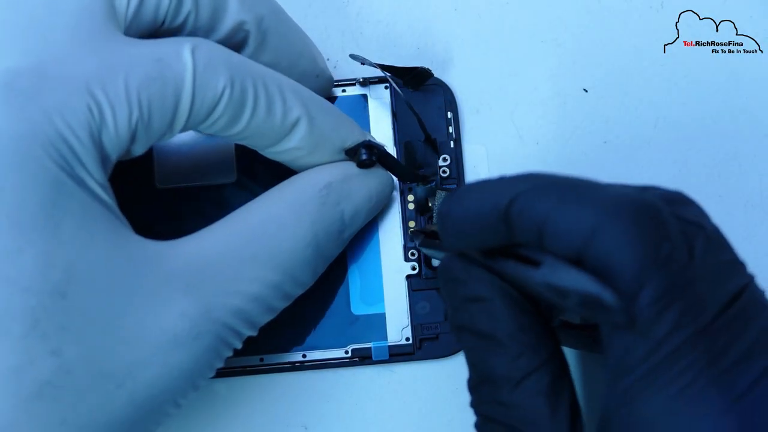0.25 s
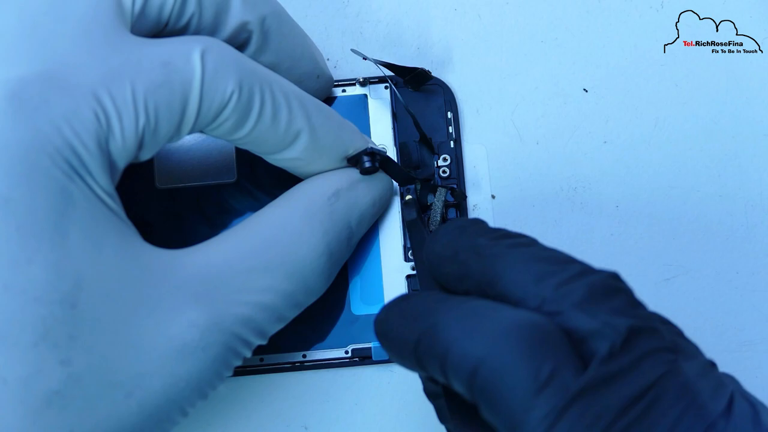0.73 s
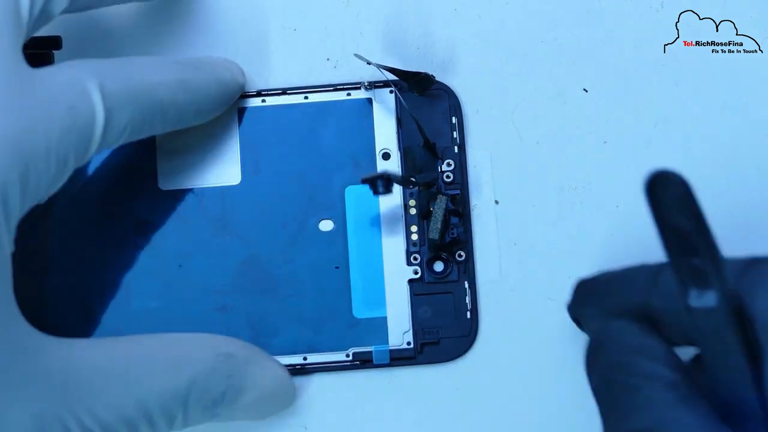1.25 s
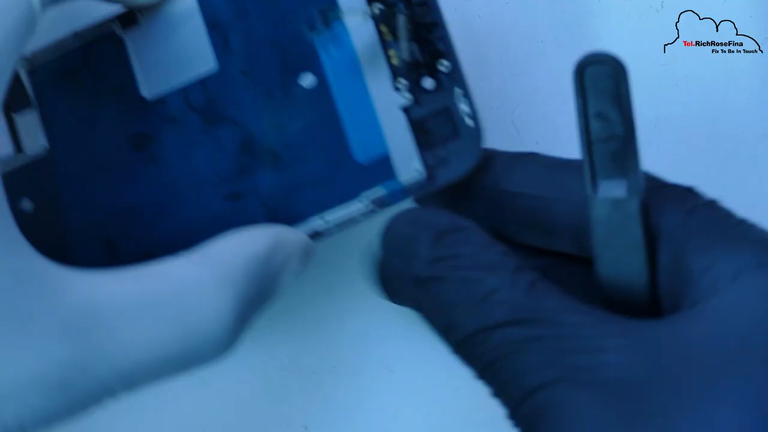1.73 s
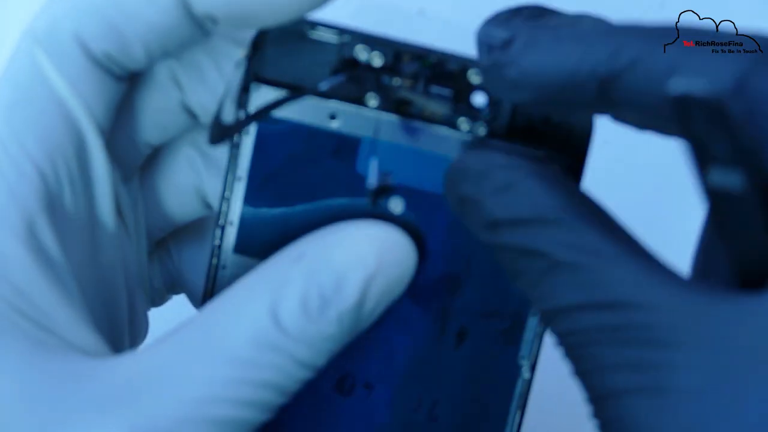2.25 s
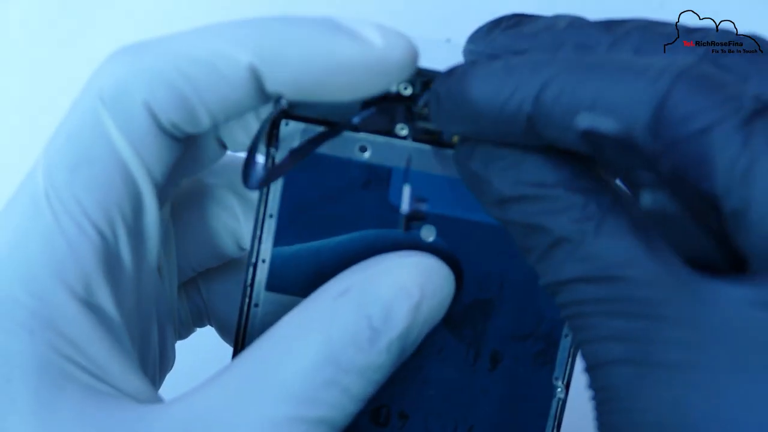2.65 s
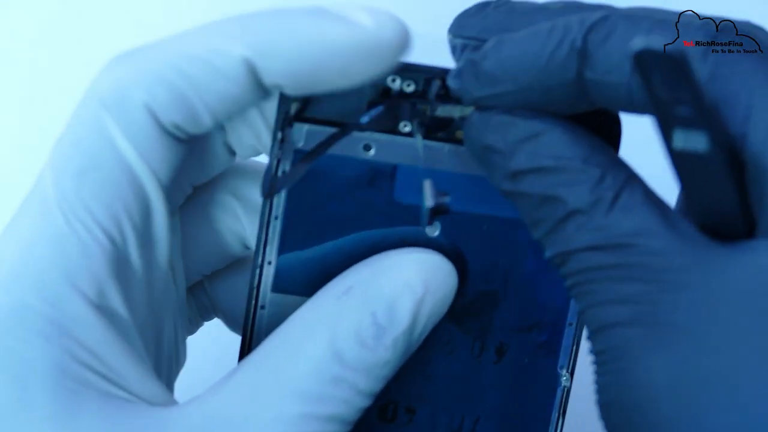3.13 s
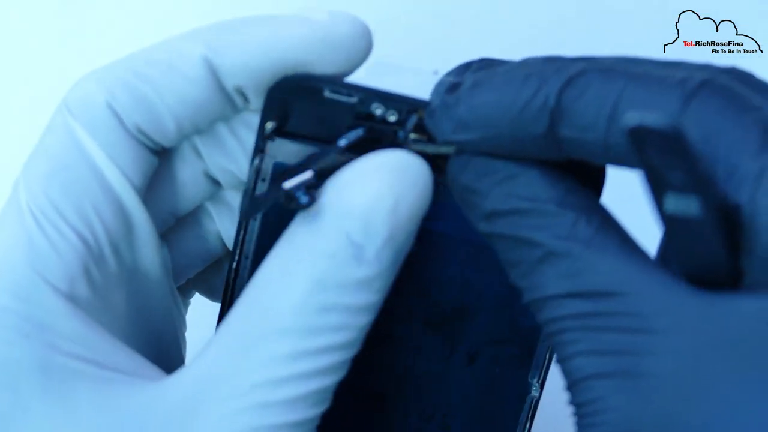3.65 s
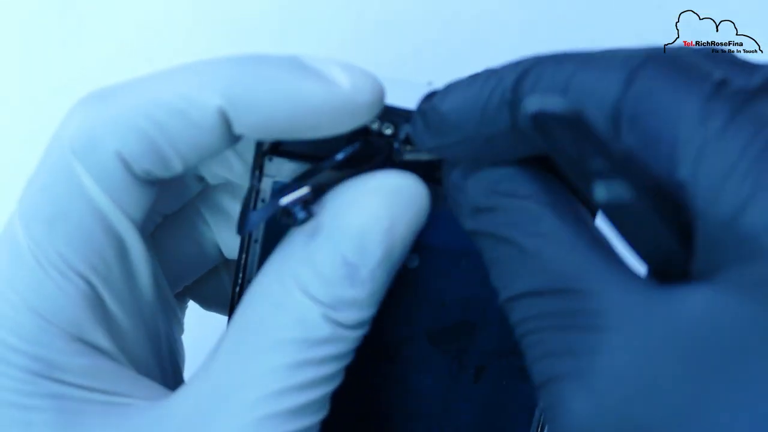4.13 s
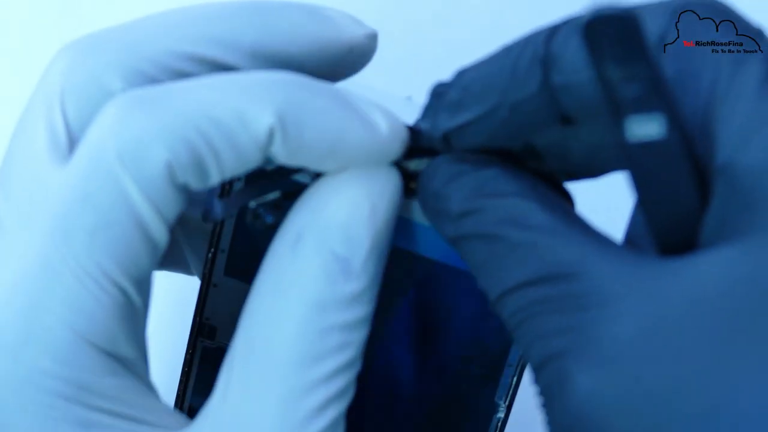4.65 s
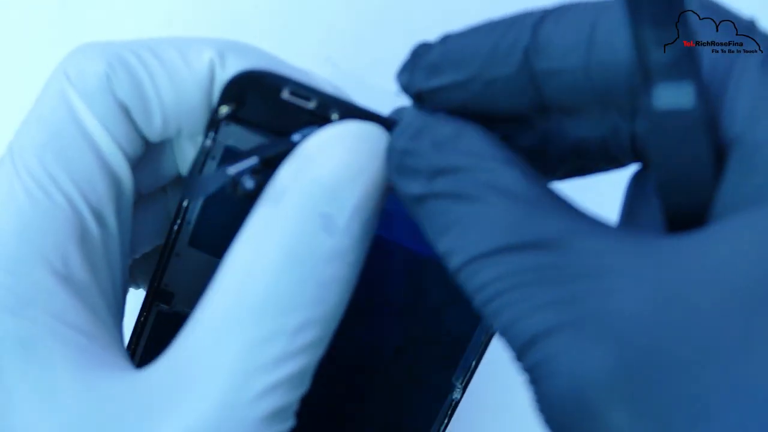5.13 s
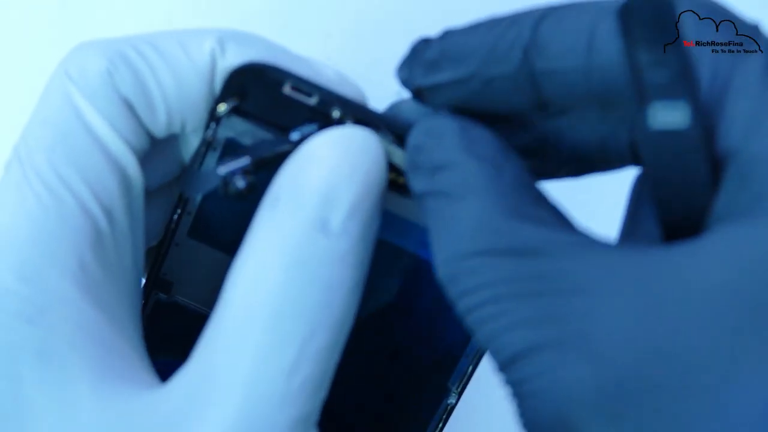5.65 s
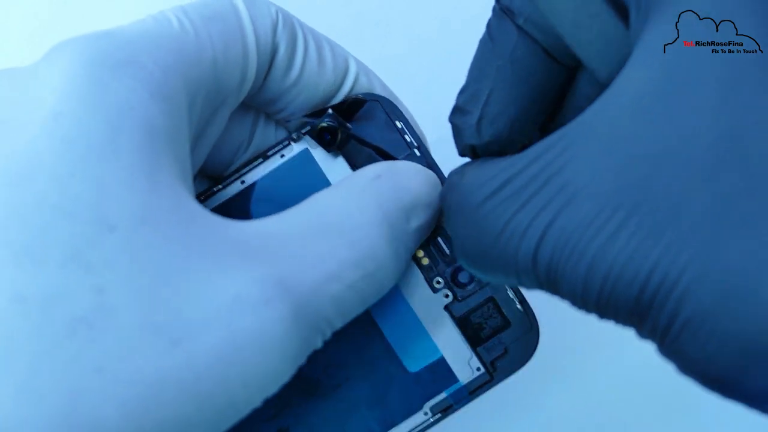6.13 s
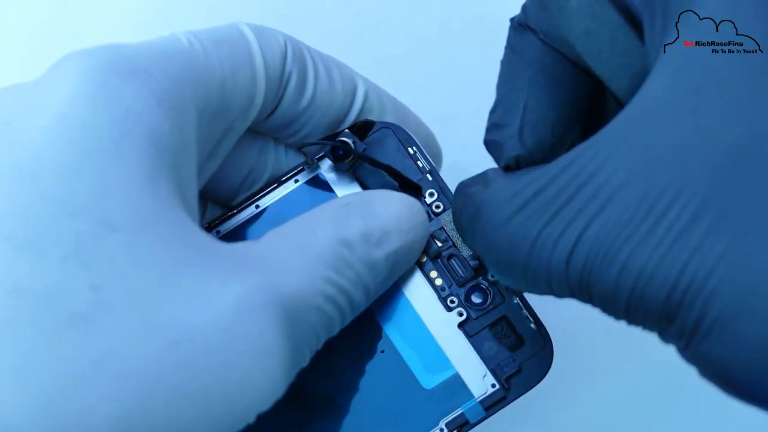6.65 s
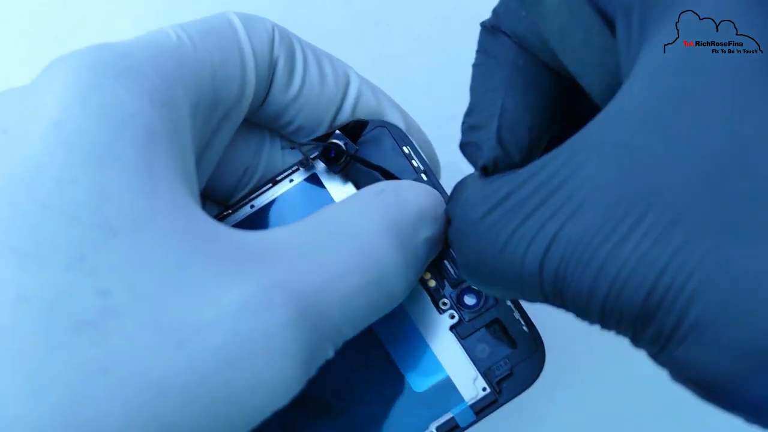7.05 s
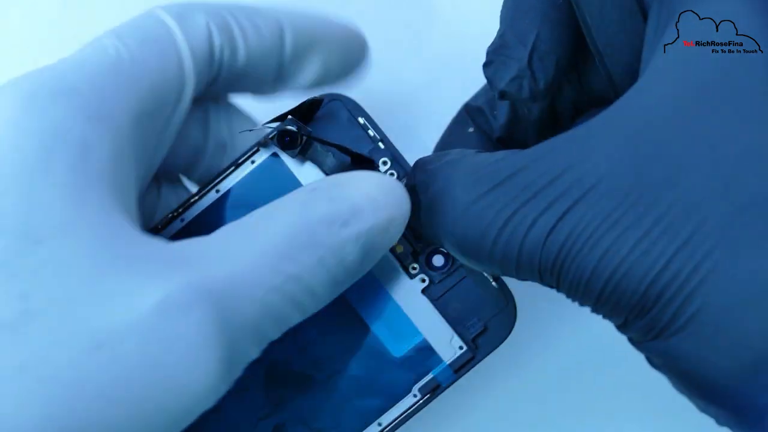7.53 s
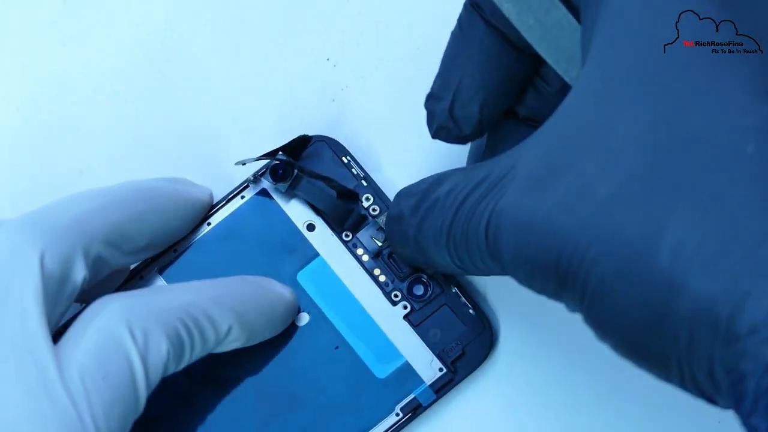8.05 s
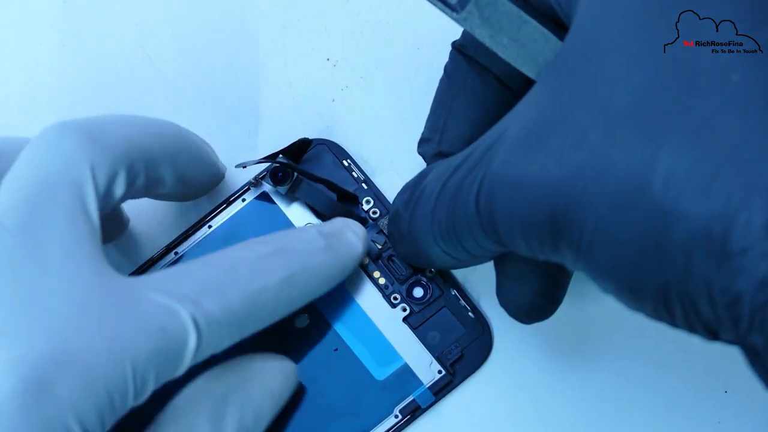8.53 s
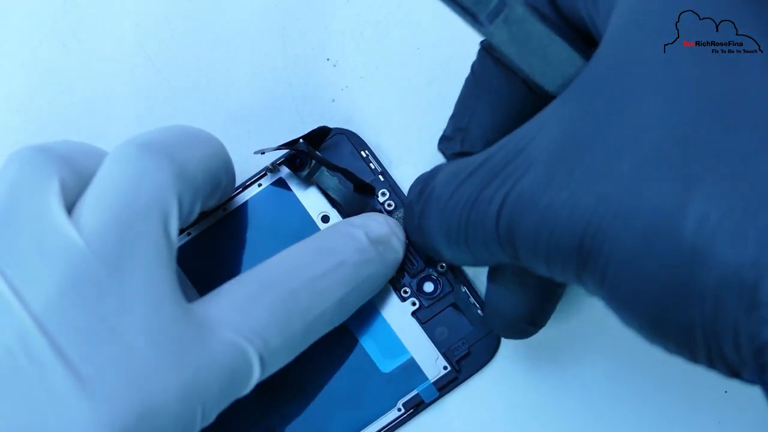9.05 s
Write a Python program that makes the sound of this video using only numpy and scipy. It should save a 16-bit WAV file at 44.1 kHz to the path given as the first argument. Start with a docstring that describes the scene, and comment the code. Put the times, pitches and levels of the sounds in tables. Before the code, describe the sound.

Metal tweezers tick, scrape and snap small parts on a hand-held phone screen while rubber gloves rub faintly over a low workshop hum.

```python
"""Tweezers on a phone screen assembly

Steel tweezers tick (impact), scrape (stick-slip) and snap small parts home on a hand-held screen; each blow
excites damped resonances. Rubber gloves rub and crinkle as filtered noise and grains, with short raspy squeaks.
The bench hums as resonant noise and booms twice; after the second boom a stand sways. A fan adds harmonics
and shaped air noise. The two channels differ only in a faint hiss, and the level dips briefly twice."""
import sys
import numpy as np
from scipy import signal
from scipy.fft import rfft, irfft, next_fast_len
from scipy.io import wavfile
from scipy.ndimage import uniform_filter1d, map_coordinates

SR = 44100
rng = np.random.default_rng(int(sys.argv[2]) if len(sys.argv) > 2 else 0)


def to_wav(s):
    """Save 16-bit WAV."""
    ch = np.atleast_2d(s).T  # columns
    pcm = np.round(np.clip(ch, -1, 1) * 32767)  # PCM
    wavfile.write(sys.argv[1], SR, pcm.astype(np.int16))


N = 410130
T = np.arange(N) / SR  # scene time [s]
AGE = np.arange(SR // 4) / SR  # time since the start of a short sound [s]


def amp(db):
    """Logarithmic level: decibels to amplitude gain."""
    return 10 ** (np.asarray(db) / 20)


def unit(x):
    """Normalization: scale to an rms of 1."""
    return x / np.sqrt(np.mean(x ** 2) + 1e-20)


def sized(x, db, length=1 / 100):
    """Equal energy: give a short sound the energy of db rms held for length seconds."""
    energy = np.sum(x ** 2) + 1e-20
    return x * amp(db) * np.sqrt(length * SR / energy)


def level(rows):
    """Linear interpolation in decibels: gain per sample from rows of (time [s], level [dB])."""
    return amp(np.interp(T, *np.transpose(rows)))


def swells(rows):
    """Power summation of Gaussian swells from rows of (middle [s], length [s], peak level [dB])."""
    power = 0
    for middle, length, db in rows:
        bell = np.exp(-2 * ((T - middle) / length) ** 2)
        power = power + (amp(db) * bell) ** 2
    return np.sqrt(power)


def along(points, hz):
    """Spectral envelope: gain of (frequency [Hz], level [dB]) points joined on a log axis."""
    f, db = np.transpose(points)
    return amp(np.interp(np.log(hz + 1), np.log(f), db))


def wobble(rate):
    """Slow random modulation: a smooth curve with rate random knots a second."""
    knots = rng.standard_normal(int(N * rate / SR) + 4)
    return map_coordinates(knots, [T * rate])


def filtered(x, response):
    """Linear filtering: multiply the spectrum of x by a response of frequency."""
    size = next_fast_len(len(x) + 8192)  # padding leaves room for the tail
    spectrum = rfft(x, size) * response(np.fft.rfftfreq(size, 1 / SR))
    return irfft(spectrum, size)[:len(x)]


def resonance(hz, centre, width):
    """Damped oscillator: causal response of one resonance, width in Hz."""
    return 1j * hz * width / (centre ** 2 - hz ** 2 + 1j * hz * width)


def fade(t60):
    """Exponential decay: a loss of 60 dB in t60 seconds."""
    return np.exp(-np.log(1000) * AGE / t60)


def add(track, s, sound):
    """Superposition: mix a sound into the track at s seconds."""
    part = track[round(s * SR):][:len(sound)]
    part += sound[:len(part)]


def ring(modes, scatter_db, detune):
    """Modal synthesis of a hand-held body; the grip changes each mode's strength and pitch."""
    hz, db, t60 = np.transpose(modes)
    size, pitch, phase = rng.standard_normal((3, len(hz), 1))
    actual_hz = hz[:, None] * (1 + detune * pitch)
    waves = np.sin(2 * np.pi * (actual_hz * AGE + phase))
    strength = amp(db[:, None] + scatter_db * size)
    return np.sum(strength * fade(t60[:, None]) * waves, axis=0)


def tip(force, ring_hz, width_hz, crack_db):
    """Source and resonator: a force makes the steel tip ring over a broad crack."""
    def response(hz):
        crack = resonance(hz, 10900, 11700) * resonance(hz, 6900, 16000)
        return resonance(hz, ring_hz, width_hz) + amp(crack_db) * crack
    return filtered(force, response)


# light taps of the tweezer tip: (time [s], tip level [dB], tip ring [Hz])
TICKS = [(.227, -43, 12130), (0.3566, -37.5, 13200), (.9852, -44, 12890), (1.4006, -27, 13900),
         (1.622, -41, 9500), (1.7325, -36.5, 13200), (1.9712, -36.5, 13200), (2.399, -44.5, 5770),
         (2.6028, -39, 14000), (2.7197, -44, 14100), (3.0355, -46, 12470), (3.106, -36, 15200),
         (3.8054, -34.5, 13300), (3.999, -40, 14300), (4.1358, -39, 13600), (4.5953, -42.5, 13700),
         (4.8, -36.5, 14670), (5.2672, -37, 9800), (7.5332, -35, 6540), (7.9816, -33.5, 8240),
         (8.15, -46, 4520)]
TAP_FRAME_DB, TAP_CRACK_DB = -13.5, -12.5  # frame relative to tip, crack relative to ring [dB]
# parts snapping into place: (time [s], tip level [dB], tip ring [Hz], crack relative to ring [dB],
# seating level [dB], seating ring [Hz], frame level [dB], whole-screen level [dB])
SNAPS = [(0.0666, -33.5, 10200, -3, -40, 5100, -36.5, -49), (1.416, -41, 9100, -1, -40, 5860, -39.5, -45),
         (1.429, -34, 13100, -1, -57, 5300, -51, -42.5), (4.0012, -37, 14100, -3, -39.5, 5200, -53, -51),
         (4.9687, -30.5, 10300, 0, -31.5, 4900, -35, -28.5), (7.6617, -30, 10000, 0, -29, 5560, -33, -30.5),
         (8.1707, -19.5, 8340, -8, -29, 12300, -40.5, -39.5)]
SEAT_S, SEAT_CRACK_DB = 0.00128, -14  # seating delay after the click [s], crack relative to ring [dB]


def contacts():
    """Successive impacts: a tap is one contact, a snap is a click and then its seating.

    Rows are (time [s], tip level [dB], tip ring [Hz], frame level [dB], crack level [dB])."""
    rows = [(s, db, hz, db + TAP_FRAME_DB, TAP_CRACK_DB) for s, db, hz in TICKS]
    for s, db, hz, crack_db, seat_db, seat_hz, frame_db, _ in SNAPS:
        rows.append((s, db, hz, frame_db, crack_db))
        rows.append((s + SEAT_S, seat_db, seat_hz, frame_db, SEAT_CRACK_DB))
    return rows


# modes of the metal frame, before scatter and detuning: (frequency [Hz], level [dB], own t60 [s])
FRAME_MODES = [(1947, 0.5, 0.08), (2290, -10, 0.051), (2544, 1, 0.039), (3017, -5.5, 0.12),
               (3480, 0, 0.032), (4016, -2, 0.032)]
# a stronger contact is a cleaner blow: from this tip level [dB], blow gain per dB of tip level [dB]
HARD_ABOVE_DB, HARDENING = -32, 1.1


def ticks():
    """Impact excitation: a sharp blow with quick chatter; the room trails it, a little duller."""
    out = np.zeros(N)
    for s, tip_db, ring_hz, frame_db, crack_db in contacts():
        chatter, near, far = rng.standard_normal((3, len(AGE)))
        room = amp(-13) * near * fade(.028) + amp(-21) * far * fade(.075)
        dull_room = filtered(room, lambda hz: 1 / (1 + 1j * hz / 16000))
        force = chatter * fade(.004) + dull_room
        force[0] += 1.1 * amp(HARDENING * max(tip_db - HARD_ABOVE_DB, 0))
        add(out, s, sized(tip(force, ring_hz, width_hz=940, crack_db=crack_db), tip_db))
        frame = unit(ring(FRAME_MODES, scatter_db=2, detune=.03) * fade(.06))  # extra damping
        rattle = unit(filtered(force, lambda hz: resonance(hz, 2980, 1100) ** 2))
        add(out, s, sized(frame + amp(-3) * rattle, frame_db))
    return out


# the tip slides over a part: (time [s], length [s], upper ring level [dB], lower ring level [dB])
SCRAPES = [(1.401, 0.017, -41, -40), (1.417, 0.013, -43, -35), (1.613, 0.016, -39, -49),
           (1.84, 0.028, -44.5, -44.5), (1.993, .013, -41, -56), (2.31, .012, -48, -58),
           (3.809, .037, -48, -46.5), (3.881, 0.0088, -47, -39), (3.941, .017, -42, -42.5),
           (4.012, 0.015, -45, -52), (4.063, 0.014, -51, -42.5), (4.932, .012, -47, -56),
           (7.985, 0.0087, -38, -37)]
SCRAPE_UPPER_HZ, SCRAPE_LOWER_HZ = 13500, 5350  # the two rings of the sliding tweezers
SCRAPE_FRAME_DB = -7  # frame relative to the lower ring


def scrapes():
    """Stick-slip friction: a sliding tip gives a run of tiny uneven blows."""
    out = np.zeros(N)
    for s, length, upper_db, lower_db in SCRAPES:
        blows = rng.standard_normal(len(AGE))
        uneven_db = 4 * np.repeat(rng.standard_normal(len(AGE)), repeats=32)[:len(AGE)]
        stroke = np.exp(-np.abs(2 * AGE / length - 1) ** 3)
        force = blows * amp(uneven_db) * (stroke + amp(-6) * fade(0.26))  # the room trails the stroke
        for ring_hz, tip_db in (SCRAPE_UPPER_HZ, upper_db), (SCRAPE_LOWER_HZ, lower_db):
            add(out, s, sized(tip(force, ring_hz, width_hz=800, crack_db=-8), tip_db, length))
        frame = signal.fftconvolve(force, ring(FRAME_MODES, scatter_db=1.5, detune=0.025))
        add(out, s, sized(frame, lower_db + SCRAPE_FRAME_DB, length))
    return out


# modes of the whole screen in the hand, before scatter and detuning: (frequency [Hz], level [dB], t60 [s])
SCREEN_MODES = [(367, -2, 0.11), (512, -4, 0.022), (610, 4.5, 0.07), (904, 3.5, 0.062), (1270, 13, 0.018),
                (1560, 4.5, 0.067)]
# low bending of the screen rings on in the hand: (time [s], starting amplitude [dB], frequency [Hz])
THUDS = [(0.079, -38, 293), (.227, -44, 298), (1.429, -31, 305), (1.561, -46, 273), (2.227, -42, 235),
         (2.602, -44, 340), (4.971, -29, 325), (7.663, -32.5, 347), (8.172, -41, 280)]
# dull bumps of the hands: (time [s], amplitude before the rounded onset [dB], decay constant [s])
BUMPS = [(2.226, -34, .001), (6.0243, -19, 0.00076), (8.169, -34, 0.00094), (8.195, -35, 0.0022),
         (8.997, -35.5, 0.0033)]


def knocks():
    """Modal response: snaps ring the screen and the room answers; a soft bump is one rounded push."""
    out = np.zeros(N)
    for s, *_, db in SNAPS:
        body = unit(ring(SCREEN_MODES, scatter_db=2.5, detune=.02))
        burst = rng.standard_normal(len(AGE)) * fade(0.14)
        room = filtered(burst, lambda hz: resonance(hz, 780, 1500) ** 2)
        add(out, s, sized(body + amp(-4.0) * unit(room), db))
    for s, db, hz in THUDS:
        add(out, s, amp(db) * fade(0.072) * np.sin(2 * np.pi * hz * AGE))
    for s, db, decay in BUMPS:
        add(out, s, amp(db) * np.exp(-AGE / decay) * (1 - fade(0.000087)))
    return out


# faint squeaks: (time [s], amplitude before the lift [dB], middle pitch [Hz])
SQUEAKS = [(.064, -48.5, 1770), (.2, -49, 1710), (.44, -51.5, 2290), (.52, -53, 2010), (.91, -49, 2790),
           (1.07, -56, 2160), (4.56, -53, 2000), (7.19, -54, 2720), (7.447, -46.5, 1715),
           (7.842, -51.5, 1680)]
SQUEAK_S, SQUEAK_LIFT_DB = 0.067, 2.0  # length [s], lift of every squeak [dB]


def squeaks():
    """Frequency and amplitude modulation: short raspy tones that sag a little in pitch."""
    out = np.zeros(N)
    for s, db, hz in SQUEAKS:
        progress = np.minimum(AGE / SQUEAK_S, 1)
        noise = rng.standard_normal((2, len(AGE)))
        unsteady, rasp = unit(uniform_filter1d(noise, size=110))
        pitch = hz * (1 + .03 * (.5 - progress) + .025 * unsteady)
        swell = np.sin(np.pi * progress) * (1 + .5 * rasp)
        tone = np.sin(2 * np.pi * np.cumsum(pitch) / SR)
        add(out, s, amp(db + SQUEAK_LIFT_DB) * swell * tone)
    return out


# the holding grip rubs less and less: (time [s], level [dB])
RUB_REST = [(0, -52), (3.5, -55), (7.5, -57), (8.6, -79)]
# a glove strokes the screen: (middle [s], length [s], peak level [dB])
STROKES = [(.68, 0.083, -47.5), (1.08, .2, -46), (1.32, 0.17, -46), (1.54, 0.043, -44), (2.05, 0.71, -52),
           (4.03, 0.16, -58), (7.75, 0.59, -51), (9.28, 0.17, -50)]


def rubbing():
    """Power summation: how hard the gloves rub, as the holding grip plus single strokes."""
    return np.hypot(level(RUB_REST), swells(STROKES))


# spectrum of rubber on metal and glass: (frequency [Hz], relative density [dB])
RUBBER = [(300, -41), (1200, 8.5), (2500, -0.5), (5000, 1), (9000, -2.5), (14000, -6.5), (16000, -4)]
# spectrum of a dull shuffle: (frequency [Hz], relative density [dB])
SHUFFLE = [(20, 8), (80, 8.5), (300, 7), (650, 5), (1500, -10.5), (5000, -52)]
# the screen is pushed over the bench: (middle [s], length [s], peak level [dB])
PUSHES = [(1.44, 0.36, -48.5), (1.83, 0.091, -51.5), (2.22, 0.075, -53.5), (8.1, 0.97, -58.5)]
SHIFT_REST_DB = -70  # shuffle between pushes


def gloves():
    """Granular friction noise: rubber creeps in fine crackles while the hands shift the screen about."""
    grains = rng.standard_normal(N) * (rng.random(N) < 450 / SR)  # about 450 grains a second
    crackle = unit(grains) + 1.6 * rng.standard_normal(N)
    rub = unit(filtered(crackle, lambda hz: along(RUBBER, hz))) * amp(2.1 * wobble(35))
    shuffle = unit(filtered(rng.standard_normal(N), lambda hz: along(SHUFFLE, hz)))
    shuffle *= amp(3.7 * wobble(22))
    pushing = np.hypot(amp(SHIFT_REST_DB), swells(PUSHES))
    return rubbing() * rub + pushing * shuffle


def crinkles():
    """Random elastic release: folds of glove and flex cable tick, louder while the gloves rub harder."""
    out, busy = np.zeros(N), rubbing()
    for when, size, colour in rng.random(size=(150, 3)):
        s = when * (N - 1) / SR
        force = rng.standard_normal(len(AGE)) * fade(0.02) * (1 - fade(.006))
        snap = tip(force, 9000 + 6000 * colour, width_hz=1400, crack_db=-5)
        loudness = busy[int(s * SR)] ** .28
        add(out, s, sized(snap, -42 + 7 * size ** 2) * loudness)
    return out


# brief dips in level, the first of which also ends the swaying: (start [s], end [s])
DIPS = [(5.759, 5.805), (8.774, 8.789)]
# resting level of the bench hum: (time [s], level [dB])
HUM_REST = [(0, -57), (4.2, -59.5), (6, -56.5), (9.3, -55)]
# the bench hum swells: (middle [s], length [s], peak level [dB])
HUM_SWELLS = [(3.38, 0.06, -50), (4.8, 0.078, -48.5), (5.68, 0.13, -50), (6.58, 0.28, -46.5),
              (8.15, 0.58, -54)]
# jolts that ring the bench: (time [s], amplitude before rise and decay [dB], rise constant [s], t60 [s])
JOLTS = [(2.79, -31, 0.041, 0.38), (4.975, -28, 0.013, 0.89)]


def bench():
    """Resonant noise and damped oscillation: the bench hums and booms; the stand sways and shudders."""
    hum = unit(filtered(rng.standard_normal(N), lambda hz: resonance(hz, 115.4, 13.3) ** 2))
    steadier_hum = unit(hum / (1 + .5 * np.abs(signal.hilbert(hum))))  # strong peaks are compressed
    out = np.hypot(level(HUM_REST), swells(HUM_SWELLS)) * steadier_hum
    low_hum = unit(filtered(rng.standard_normal(N), lambda hz: resonance(hz, 63.6, 14.0) ** 2))
    out += amp(-67.5) * low_hum
    for s, db, rise, t60 in JOLTS:
        age = np.maximum(T - s, 0)
        boom = np.sin(2 * np.pi * 109 * age) + amp(-12.5) * np.sin(2 * np.pi * 55 * age)
        out += amp(db) * (1 - np.exp(-age / rise)) * np.exp(-np.log(1000) * age / t60) * boom
    age = np.maximum(T - 5.0, 0) * (T < DIPS[0][0])  # zero outside the swaying
    sway = age / 0.18 * np.exp(1 - age / 0.16) * np.sin(2 * np.pi * 5.26 * age)
    shudder = unit(filtered(rng.standard_normal(N), lambda hz: resonance(hz, 16.0, 9.3) ** 2))
    shudder *= (1 - np.exp(-age / .02)) * np.exp(-age / .5)
    return out + amp(-22.5) * sway + amp(-35.5) * shudder


# spectrum of the fan's air noise: (frequency [Hz], relative density [dB])
AIR = [(12, -36), (20, 2), (81, -15), (120, -14.5), (146, -12.5), (177, -13.5), (337, -16.5), (367, -12.5),
       (399, -19), (542, -11), (738, -14), (923, -9.5), (1960, -16), (4180, -16), (16000, -31)]
# the fan housing colours its air noise: (centre [Hz], width [Hz], gain [dB])
HOUSING = [(445, 44, 0.5), (676, 120, 4), (793, 135, 5.5), (1219, 320, 6), (2810, 130, 3), (3800, 2300, -5),
           (4060, 84, 7.5), (4440, 300, 5.5), (5240, 99, 5.5), (5890, 370, 3), (9100, 390, -3.5),
           (8390, 115, 6), (9140, 260, 11.5), (13100, 370, 7.5), (14700, 330, 9.5)]
FAN_HZ = 186.44  # fundamental of the whine
# harmonics of the whine: (multiple of the fundamental, amplitude before flutter [dB])
WHINE = [(2, -64.5), (3, -52.5), (5, -51), (6, -54.5), (8, -61), (10, -67), (12, -74), (14, -65.5),
         (21, -80.5), (22, -63.5), (25, -64.5), (28, -66), (38, -69), (45, -68.5)]
# other workshop tones: (frequency [Hz], amplitude before flutter [dB])
DRONE = [(260, -69.5), (520.5, -65), (699, -63), (780.4, -57)]


def fan():
    """Harmonic series and turbulence noise: slightly unsteady tones over a rush of air."""
    def housing(hz):
        gain_db = 0
        for centre, width, db in HOUSING:
            gain_db = gain_db + db / (1 + (2 * (hz - centre) / width) ** 2)
        return amp(gain_db)
    air = unit(filtered(rng.standard_normal(N), lambda hz: along(AIR, hz) * housing(hz)))
    turning = T + np.cumsum(0.00044 * wobble(2.5)) / SR  # time warped by small speed changes
    tones = np.zeros(N)
    for hz, db in [(multiple * FAN_HZ, db) for multiple, db in WHINE] + DRONE:
        flutter = np.interp(T, np.linspace(0, T[-1], num=70), rng.standard_normal(size=70))
        tones += amp(db + 2.0 * flutter) * np.sin(2 * np.pi * (hz * turning + rng.random()))
    return amp(-45.5) * air * amp(0.085 * wobble(3.3)) + tones


# spectrum of each channel's own hiss: (frequency [Hz], relative density [dB])
HISS = [(30, -4), (300, 9.5), (1000, -13), (3000, -15), (9000, -1), (16000, -0.5)]
HISS_DB = -65  # rms


def hiss():
    """Uncorrelated noise: the faint hiss of one channel."""
    return amp(HISS_DB) * unit(filtered(rng.standard_normal(N), lambda hz: along(HISS, hz)))


def scene():
    """Superposition: all sources sum to one signal that feeds both channels, each with its own hiss."""
    handling = ticks() + scrapes() + knocks() + squeaks() + gloves() + crinkles()
    mono = handling + bench() + fan()
    return np.array([mono + hiss(), mono + hiss()])


TOP_HZ = 15900  # upper band limit


def record(dry):
    """Gating and low-pass filtering: two brief 40 dB dips and a steep band limit."""
    live = np.ones(N)
    for start, end in DIPS:
        live[(T > start) & (T < end)] = amp(-40)
    live = uniform_filter1d(live, size=40)  # soft edges
    band_limit = lambda hz: 1 / np.sqrt(1 + (hz / TOP_HZ) ** 300)
    return np.array([filtered(side * live, band_limit) for side in dry])


dry = scene()
out = record(dry)
to_wav(out)
```